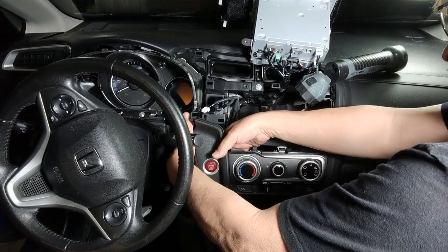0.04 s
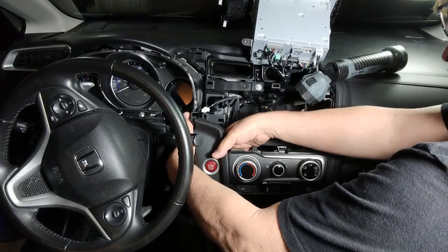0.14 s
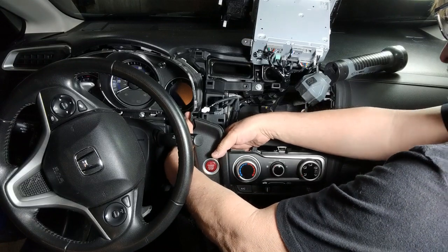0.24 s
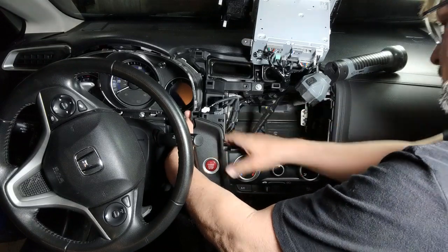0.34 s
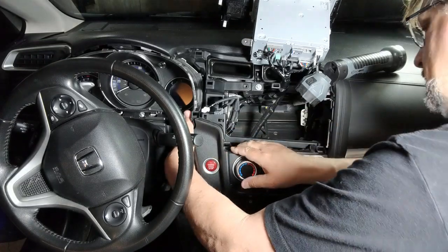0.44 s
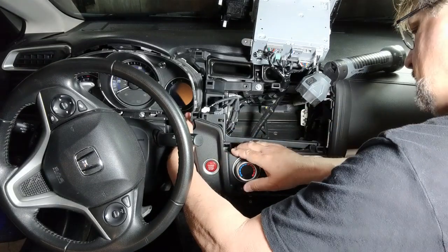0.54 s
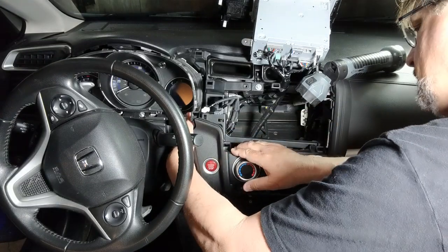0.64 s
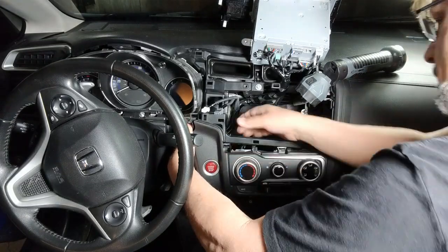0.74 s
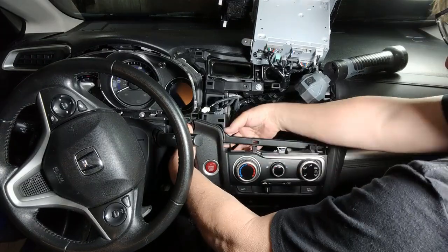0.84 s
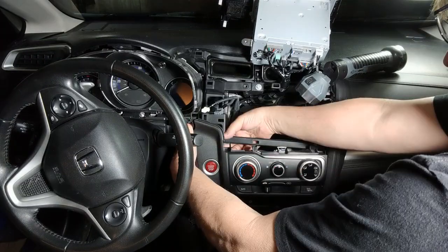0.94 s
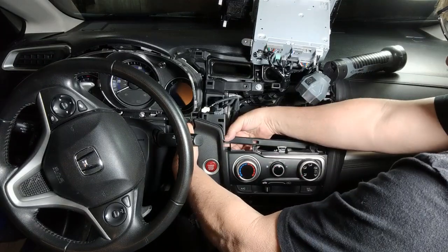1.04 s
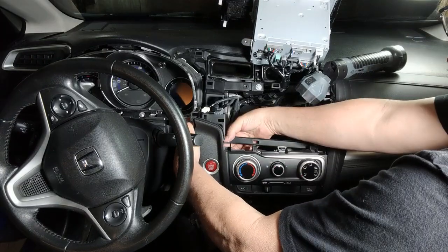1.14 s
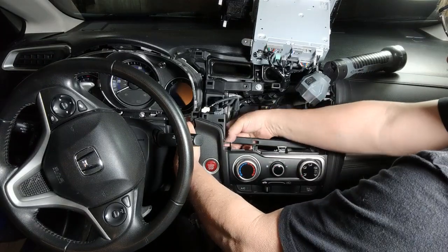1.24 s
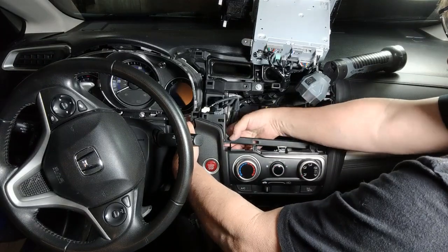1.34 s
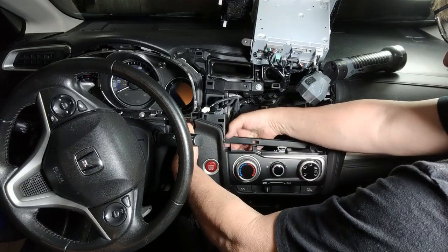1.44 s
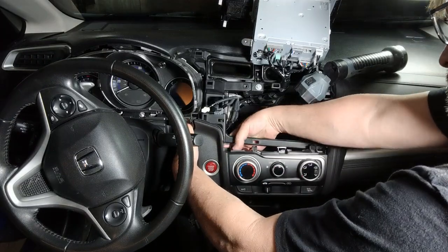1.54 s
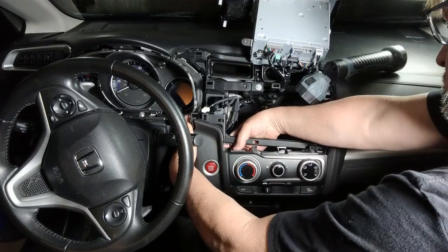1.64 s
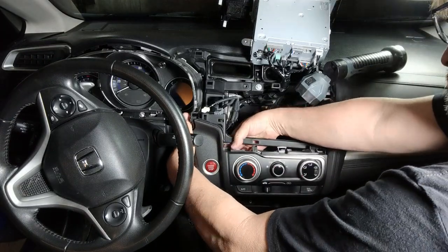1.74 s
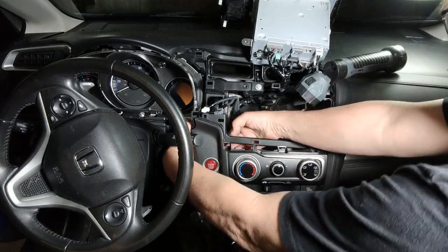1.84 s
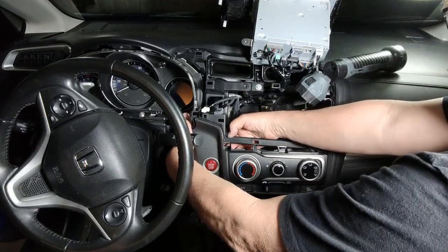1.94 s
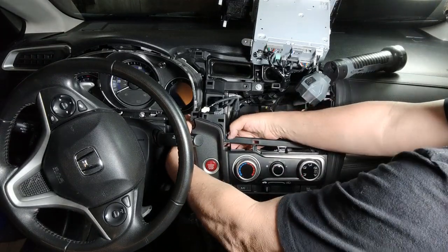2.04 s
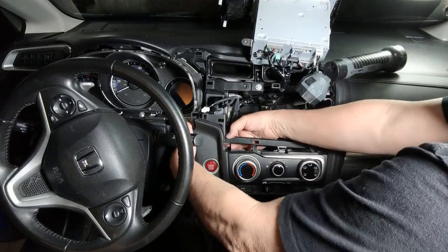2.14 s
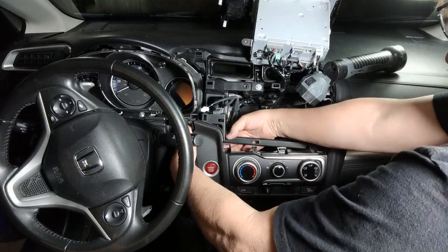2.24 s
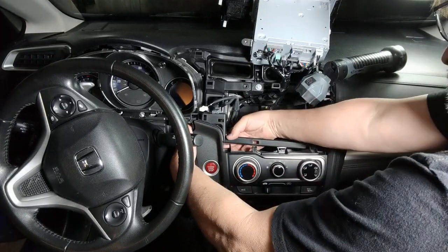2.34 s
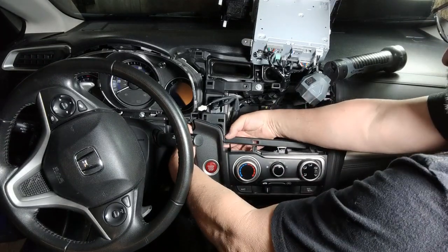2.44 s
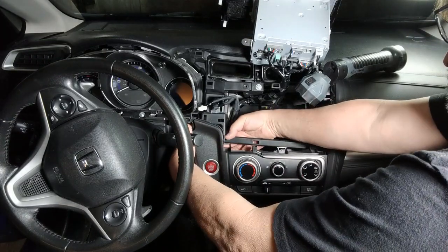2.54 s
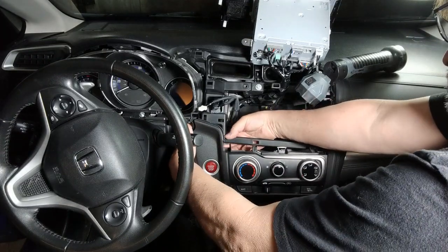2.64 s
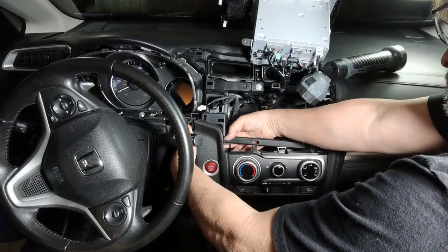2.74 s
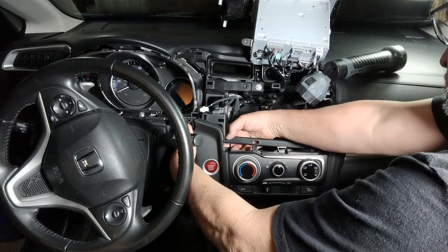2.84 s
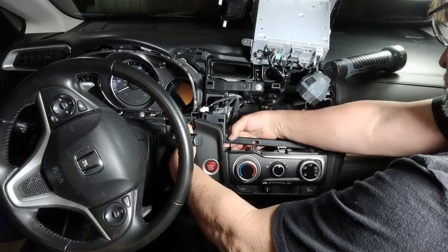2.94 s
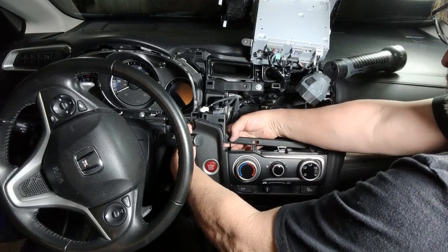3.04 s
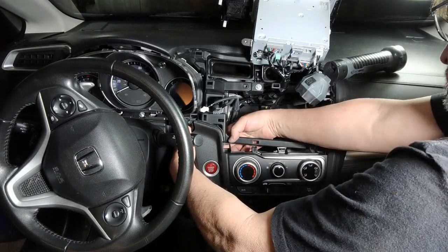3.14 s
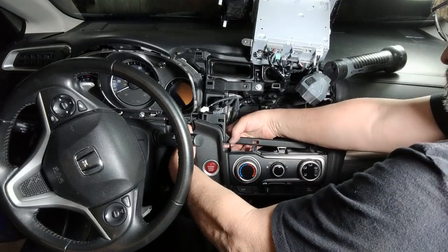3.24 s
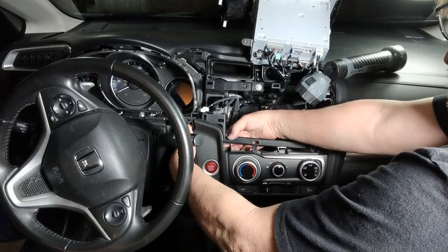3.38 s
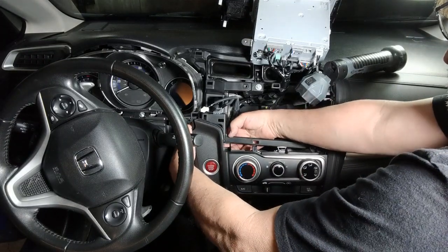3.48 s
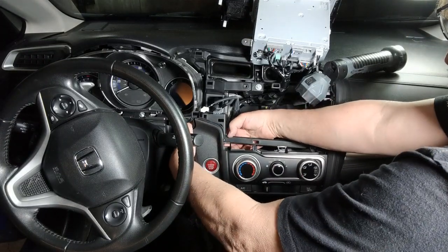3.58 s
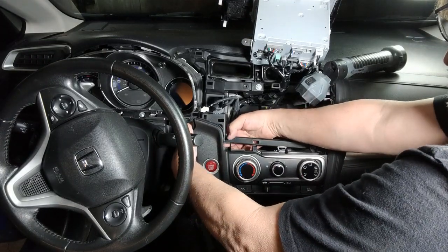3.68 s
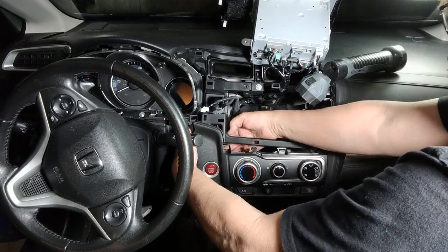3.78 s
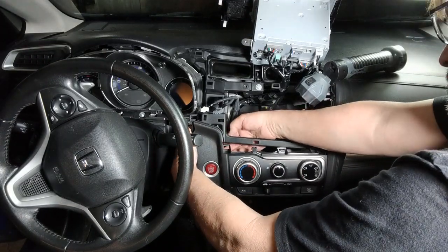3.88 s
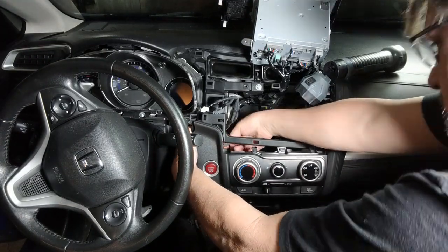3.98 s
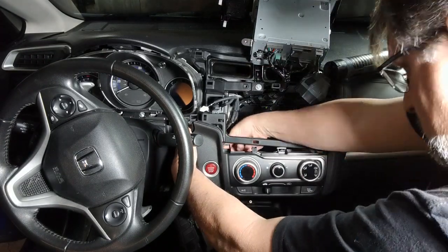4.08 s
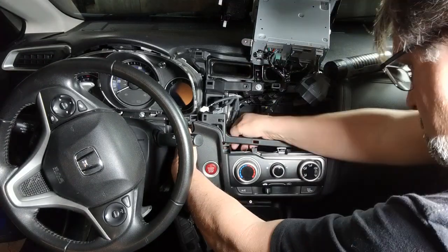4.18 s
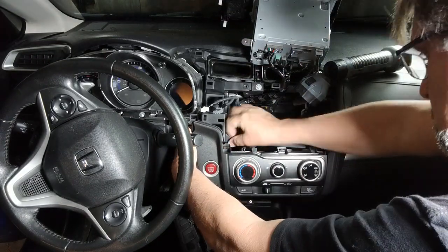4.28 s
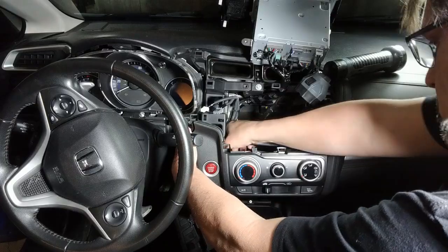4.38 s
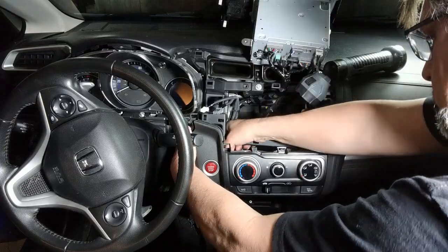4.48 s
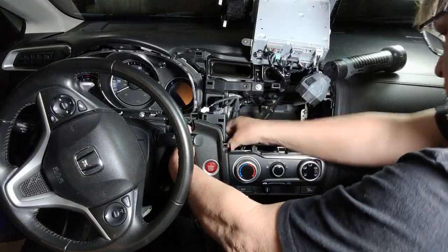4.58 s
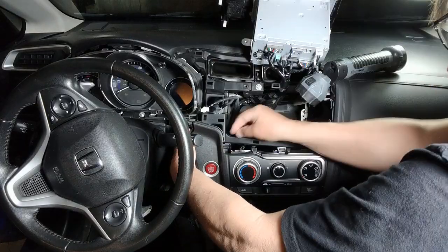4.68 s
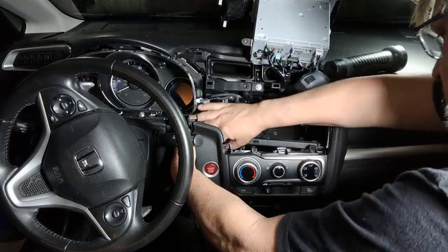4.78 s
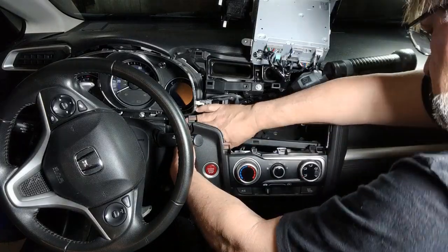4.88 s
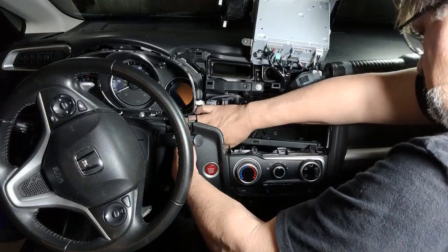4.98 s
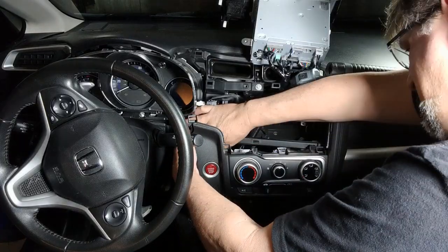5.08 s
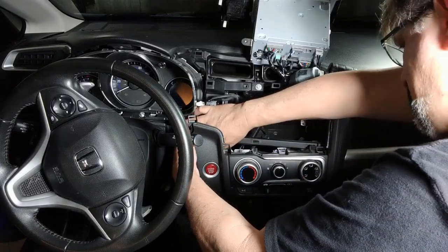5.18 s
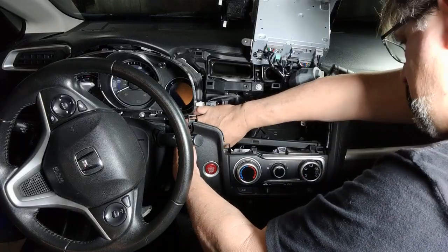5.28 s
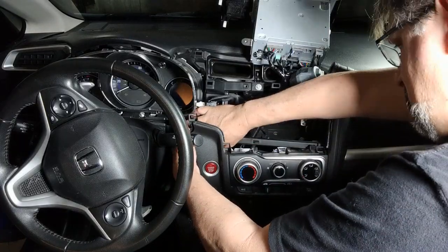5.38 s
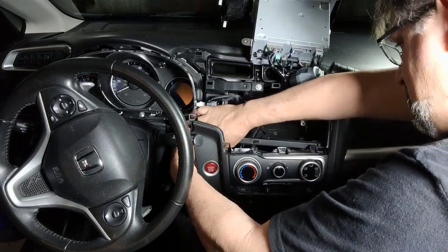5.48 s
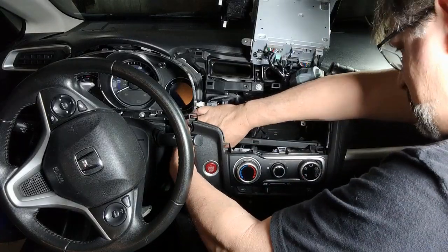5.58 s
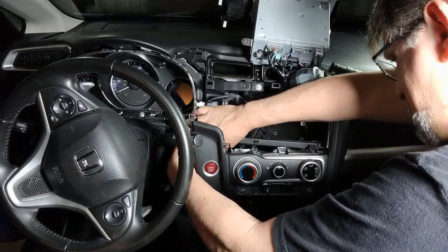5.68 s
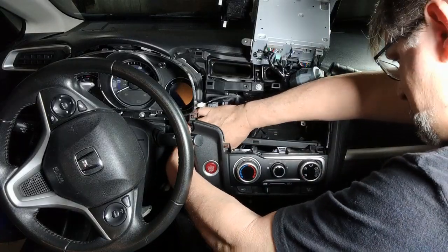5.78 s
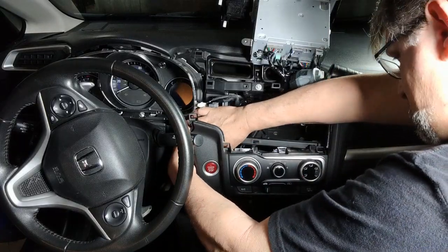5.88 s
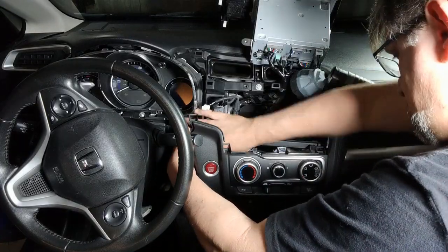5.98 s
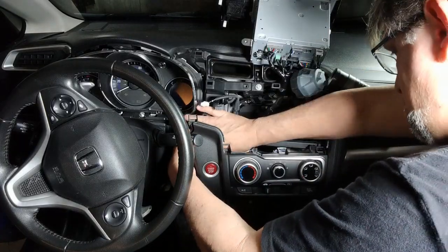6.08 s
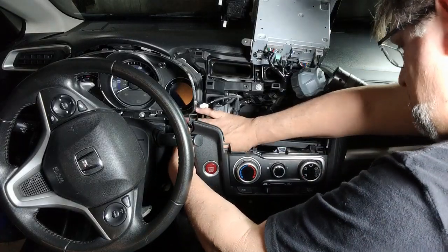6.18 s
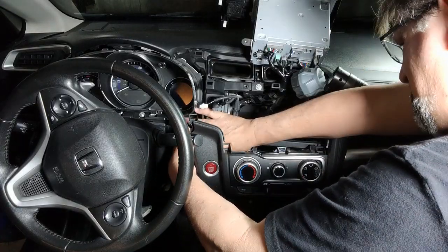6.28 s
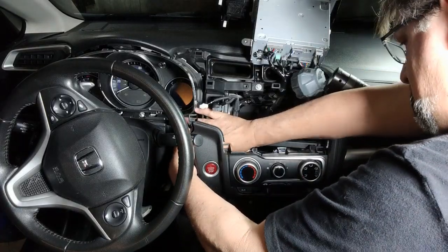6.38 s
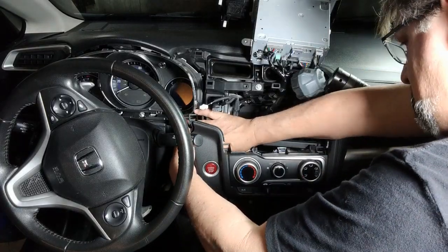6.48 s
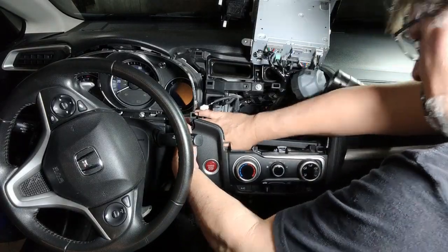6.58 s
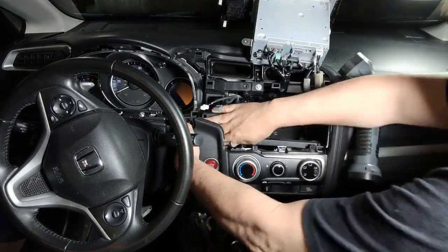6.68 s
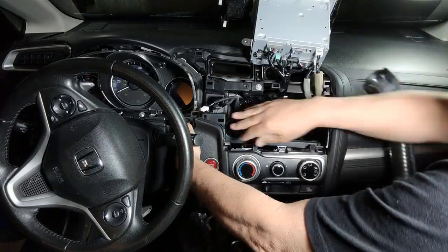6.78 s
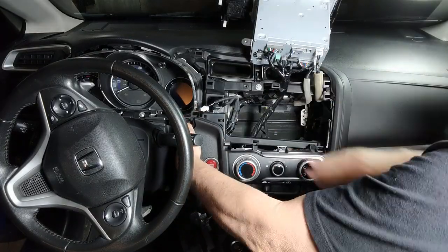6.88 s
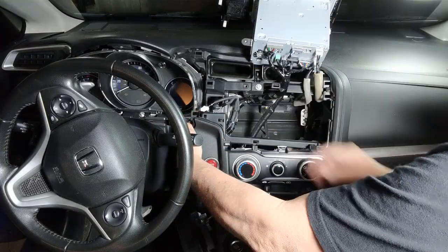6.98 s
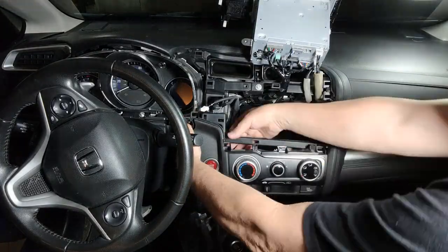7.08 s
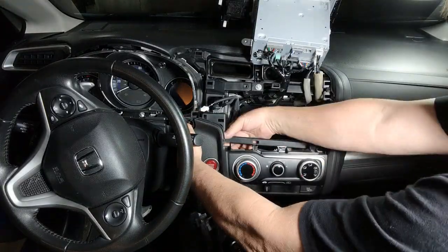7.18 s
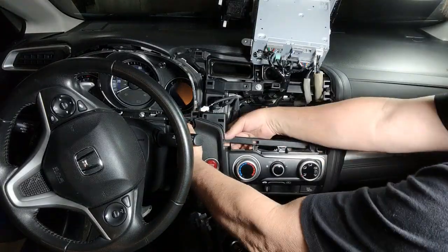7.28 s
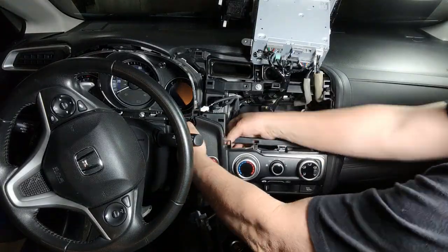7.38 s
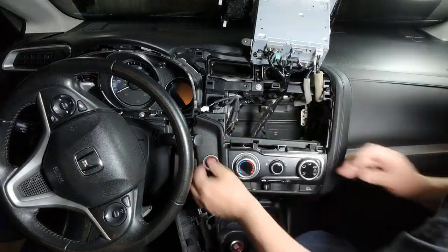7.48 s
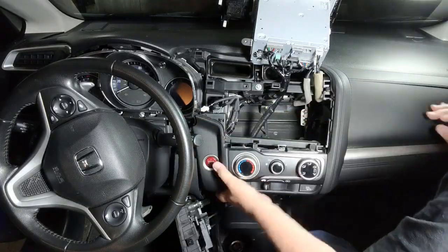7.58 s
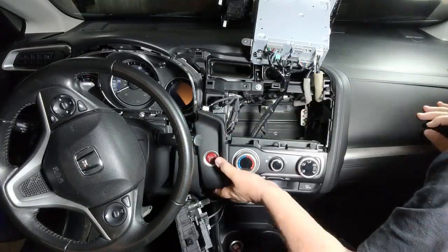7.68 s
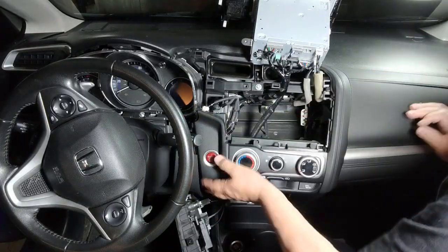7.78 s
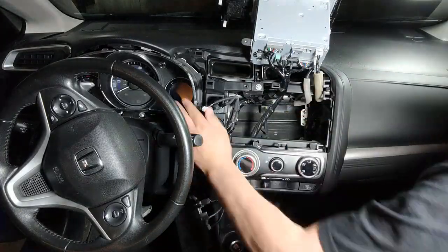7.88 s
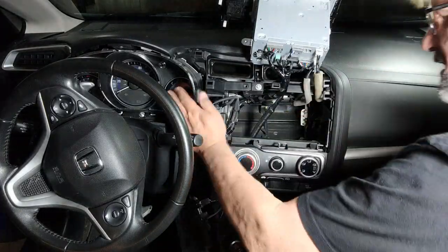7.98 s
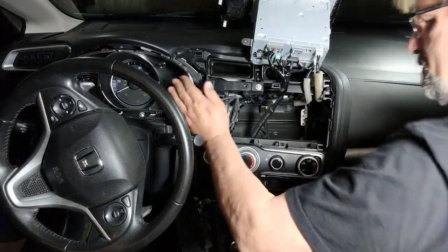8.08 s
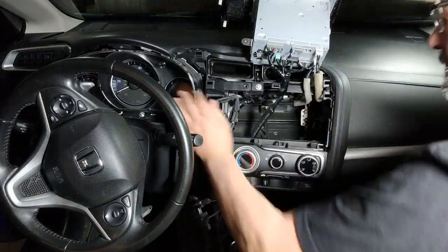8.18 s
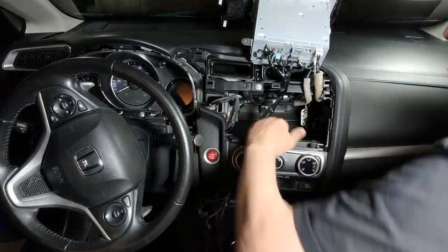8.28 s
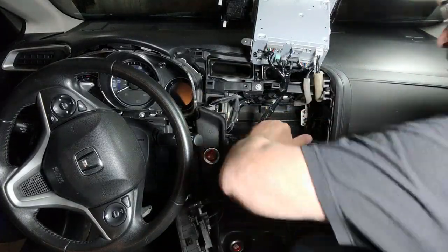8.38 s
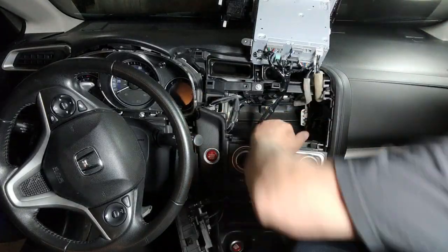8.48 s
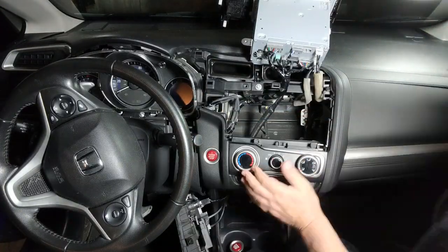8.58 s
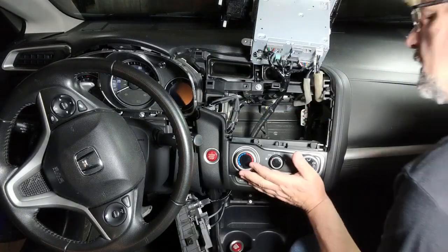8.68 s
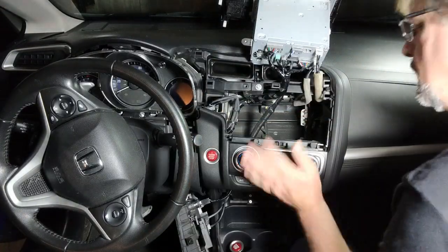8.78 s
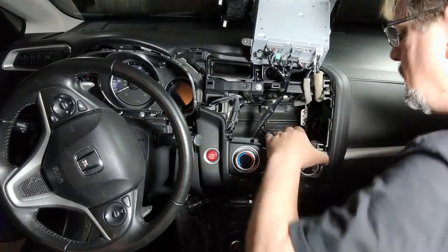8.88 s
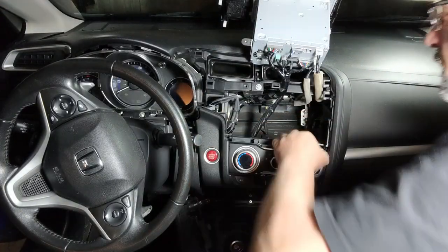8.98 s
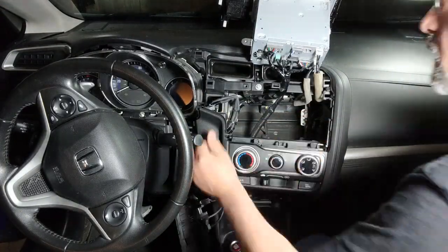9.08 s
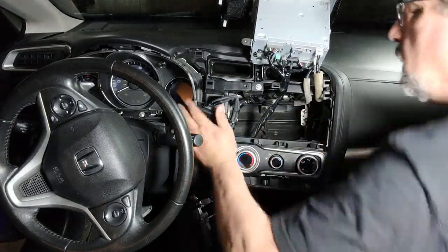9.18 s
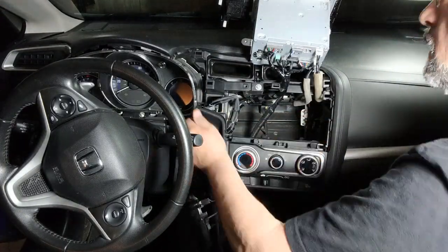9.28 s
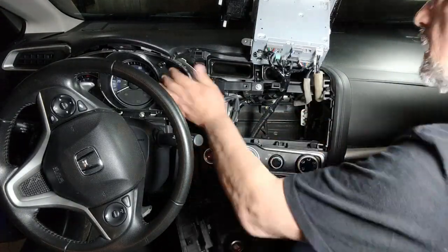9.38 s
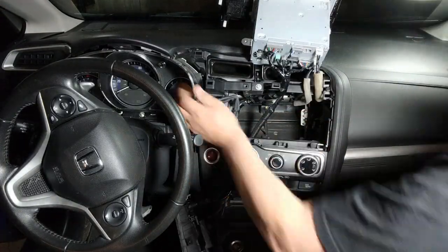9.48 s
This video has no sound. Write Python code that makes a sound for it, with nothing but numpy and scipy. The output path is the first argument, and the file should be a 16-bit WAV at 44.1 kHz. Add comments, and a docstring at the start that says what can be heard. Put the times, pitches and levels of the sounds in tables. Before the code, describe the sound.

A closed, quiet car cabin, heard in mono at arm's length, with faint still air. A low soft rumble opens and cuts off at 0.3 s. From 0.36 to 0.9 s, light plastic taps, ticks and thin scrapes; a tiny sharp scratch at 1.0. Isolated soft thuds follow around 1.6, 1.9, 2.1 and 2.3 s, then 3.1-3.4, over faint rubbing and sleeve rustle. At 4.3 a dry clack; from 4.5 to 4.8 rough little squeaks and firmer rubbing. Quiet pushing and small taps run from 5 to 6.3 s. Movement grows at 6.6-6.95 with duller thuds. A torch lands with a heavy knock at 7.08, then rocks and rattles until 7.4. Squeaks glide at 7.55-7.75 and 7.95-8.15 among clicks and thuds; the loudest snaps come at 8.1 and 8.2. Softer knocks at 8.5 and 8.8, a small tap at 9.3, a brief rub at 9.5.

```python
"""Fitting trim in a car cabin

In a closed, quiet cabin, at arm's length, plastic trim is worked into the dashboard by hand.
Clips tick and snap and the panel thuds: short bursts of noise ring its resonances. A torch lands with clunks.
Fingers rub as noisy catches and squeak as gliding harmonics; pushing stirs the cabin's low resonances.
Sleeves rustle; filtered noise makes the still air and a low rumble that opens the scene and stops abruptly."""
import sys
import numpy as np
from scipy import signal
from scipy.fft import rfft, irfft, next_fast_len
from scipy.io import wavfile
from scipy.ndimage import uniform_filter1d

SR = 44100
rng = np.random.default_rng(int(sys.argv[2]) if len(sys.argv) > 2 else 0)


def generate_wav(signal):
    """Clip the signal to [-1, 1] and save it as 16-bit WAV at the path in sys.argv[1]."""
    frames = np.transpose(np.atleast_2d(signal))
    scaled = np.clip(frames, -1, 1) * 32767
    pcm = np.round(scaled).astype(np.int16)
    wavfile.write(sys.argv[1], SR, pcm)


N = 420273
TIME = np.arange(N) / SR  # s
CUTOFF_HZ = 16100  # top of the sound and of the highest register


def from_db(db):
    """Decibels to gain."""
    return 10 ** (np.asarray(db) / 20)


def rms_one(x):
    """Scale to unit rms."""
    return x / np.sqrt(np.mean(x ** 2) + 1e-20)


def at_hz(points, hz):
    """Read a spectrum on a log-frequency axis."""
    point_hz, point_db = np.transpose(points)
    return np.interp(np.log(np.maximum(hz, 1)), np.log(point_hz), point_db)


def drift(rate, size=N):
    """Random wander of spread 1, with `rate` knots a second joined by straight lines."""
    knots = rng.standard_normal(int(size / SR * rate) + 2)
    # joining the knots narrows the spread, so widen it again
    return np.interp(np.arange(size) / SR * rate, np.arange(len(knots)), knots) * np.sqrt(3 / 2)


def coloured(x, spectrum):
    """Give a long sound a spectrum; rms 1."""
    size = next_fast_len(N)
    gain = from_db(at_hz(spectrum, np.fft.rfftfreq(size, 1 / SR)))
    return rms_one(irfft(rfft(x, size) * gain, size)[:N])


def resonate(x, modes):
    """Each mode lifts its own band and rings on."""
    for hz, width, lift_db in modes:
        ringing = signal.lfilter(*signal.iirpeak(hz, hz / width, fs=SR), x)
        x = x + (from_db(lift_db) - 1) * ringing
    return x


def struck(modes):
    """Each contact lands on another spot and drives every resonance with a strength of its own."""
    return [(hz, width, lift_db * (1 + .5 * rng.uniform(-1.0, 1))) for hz, width, lift_db in modes]


def add(track, s, sound):
    """Lay a sound into a track."""
    start = int(s * SR)
    track[start:start + len(sound)] += sound[:N - start]


# the first push of a contact against the ringing: level at 1 kHz (dB), loss towards the treble (dB per octave)
FIRST_PUSH_DB, FIRST_PUSH_LOSS_DB = -4.5, 2


def blow(levels_db, modes, rings_s, edges_hz, tail_db, tail_s):
    """One contact: a push, dense and quickly damped plastic modes, then the short wash of the cabin."""
    t = np.arange(SR // 4) / SR
    out = 0
    for low, high, level_db, ring_s in zip(edges_hz, [*edges_hz[1:], CUTOFF_HZ], levels_db, rings_s):
        octaves = np.log2(high / 1000)
        ring = from_db(-60 * t / ring_s)
        wash = from_db(tail_db - 1.4 * octaves - 60 * t / tail_s)
        # the contact builds up over its first millisecond
        build_up = 1 - np.exp(-t / 0.00018)
        shake = rng.choice([-1, 1], len(t)) * (ring + wash) * build_up
        shake[0] += np.linalg.norm(shake) * from_db(FIRST_PUSH_DB - FIRST_PUSH_LOSS_DB * octaves)
        # the plastic radiates less towards the top of each register
        shake = signal.lfilter(*signal.butter(1, 0.83 * low, fs=SR), shake)
        register = signal.butter(4, [low, high], "band", fs=SR, output="sos")
        sound = resonate(signal.sosfilt(register, shake), modes)
        # the level is the energy spread over 10 ms
        out = out + from_db(level_db) * sound / np.sqrt(np.sum(sound ** 2) / (SR / 100))
    return out


# Resonances of the dashboard plastic. Each row: centre in Hz, width in Hz, lift in dB.
PANEL = [(514, 79, 2.5), (844, 38, -1), (1437, 120, 3.5), (3835, 700, 5.5), (6030, 1420, 7)]
# Lower edges of the trim's thud, knock, clack and tick registers, in Hz.
TRIM_HZ = [200, 450, 1550, 7000]


def panel_blow(levels_db, rings_s, edges_hz):
    """A contact on the panel, with a cabin wash that falls by 60 dB in 0.1 s."""
    return blow(levels_db, struck(PANEL), rings_s, edges_hz, tail_db=-17, tail_s=.1)


# Spectrum of the still cabin air. Each row: frequency in Hz, relative level in dB.
STILL = [(25, -41), (110, -21), (220, -10), (500, -7.5), (1000, -21), (3000, -22), (16000, -36.5)]
# Spectrum of the opening rumble. Each row: frequency in Hz, relative level in dB.
RUMBLE = [(35, -18), (58, 0), (170, -18), (500, -80)]
RUMBLE_END_S = .313


def background():
    """Steady noise as still cabin air, and low noise as a rumble at the start."""
    air = from_db(-75.0) * coloured(rng.standard_normal(N), STILL)
    rumble = from_db(-62.0) * coloured(rng.standard_normal(N), RUMBLE)
    return air, rumble * uniform_filter1d(1. * (TIME < RUMBLE_END_S), size=200)


# Between moves the hands keep holding the panel.
HOLD_PUSH_DB, HOLD_RUB_DB = -63, -69.5
# A move swells and eases off over these shares of its length; they overlap, so it tops out just under full.
MOVE_ATTACK_SHARE, MOVE_RELEASE_SHARE = 0.19, 0.86
# The hands shift their grip, pushing on the panel and sliding over it.
# Each row: start in seconds, length in seconds, pushing level in dB, rubbing level in dB, before the swell.
MOVES = [(0.375, 0.16, -57, -70.5), (0.788, 0.35, -62, -65.5), (1.215, 0.2, -57.5, -70),
         (2.234, 0.13, -61, -62), (3.517, 0.28, -60, -69), (3.79, 1, -65.5, -68.5),
         (4.504, 0.47, -60, -60.5), (5.044, 0.25, -59, -63.5), (5.255, 0.17, -51.5, -61),
         (5.511, 0.052, -58, -62), (5.756, 0.53, -58.5, -69), (6.689, 0.15, -45, -53.5),
         (7.067, 0.34, -52.5, -60), (7.445, 0.24, -54, -60.5), (7.67, 0.52, -53.5, -61),
         (8.161, 0.19, -48.5, -63.5), (8.447, 0.21, -58, -62.5), (9.285, 0.17, -56.5, -66.5),
         (9.488, 0.036, -48.5, -54)]


def effort():
    """Levels of pushing and rubbing (dB): the power of a steady hold plus a swell for each move."""
    push = np.full(N, from_db(HOLD_PUSH_DB) ** 2)
    rub = np.full(N, from_db(HOLD_RUB_DB) ** 2)
    for s, length_s, push_db, rub_db in MOVES:
        along = np.linspace(0, 1, int(length_s * SR))
        swell = np.minimum(1, np.minimum(along / MOVE_ATTACK_SHARE, (1 - along) / MOVE_RELEASE_SHARE))
        add(push, s, (from_db(push_db) * swell) ** 2)
        add(rub, s, (from_db(rub_db) * swell) ** 2)
    return 10 * np.log10(push), 10 * np.log10(rub)


def pressure_of(rub_db):
    """How hard the hands bear on the plastic: 0 while holding, 1 in a firm rub."""
    return np.clip(from_db(rub_db - HOLD_RUB_DB) - 1, 0, 1)


# Catches a second on each spot, sharpness of their ring (Q), smooth sliding against the catches.
CATCHES_PER_S, CATCH_Q, SLIDE_SHARE = 70, 7, .55


def friction(pressure):
    """Sliding noise; pressure (0-1) adds tiny uneven catches, each ringing another spot of the plastic."""
    out = 0
    count = int(CATCHES_PER_S * N / SR)
    for hz in np.geomspace(TRIM_HZ[1], CUTOFF_HZ, 20):
        catches = np.zeros(N)
        catches[rng.integers(N, size=count)] = rng.standard_normal(count) * rng.random(count)
        drive = pressure * rms_one(catches) + SLIDE_SHARE * rng.standard_normal(N)
        out = out + signal.lfilter(*signal.iirpeak(hz, CATCH_Q, fs=SR), drive)
    return out


# Low resonances of the cabin. Each row: centre in Hz, width in Hz, lift in dB.
CABIN = [(216, 23, 5), (276.2, 13.2, 10.5)]
# Spectrum of pushing, ahead of the cabin. Each row: frequency in Hz, relative level in dB.
PUSH = [(60, -22.5), (135, -22.5), (190, -2), (285, -4), (400, -8.5), (900, -39)]
# Colouring of the rubbing. Each row: frequency in Hz, relative level in dB.
RUB = [(200, -10), (480, 2.5), (720, 6.5), (1300, -3.5), (2300, -10.5), (6000, -37)]
# Colouring of the sleeves and wires. Each row: frequency in Hz, relative level in dB.
RUSTLE = [(700, -56), (2000, 0), (7000, -3), (14000, 0)]
# Sleeves and wires rustle at a nearly steady level, grainier in a firm rub: level while holding, ceiling.
RUSTLE_DB, RUSTLE_TOP_DB = -73.5, -73


def hands():
    """Pushing booms in the cabin, rubbing sounds the panel, sleeves and wires rustle nearly steadily."""
    push_db, rub_db = effort()
    rustle_db = np.minimum(RUSTLE_DB + rub_db - HOLD_RUB_DB, RUSTLE_TOP_DB)
    boom = resonate(coloured(rng.standard_normal(N), PUSH), CABIN)
    grains = resonate(friction(pressure_of(rub_db)), PANEL)
    pushing = from_db(push_db) * rms_one(boom)
    rubbing = from_db(rub_db) * coloured(grains, RUB)
    rustling = from_db(rustle_db) * coloured(grains, RUSTLE)
    # the grip tightens and slackens
    grip = from_db(2 * np.clip(drift(24), -2, 1))
    return grip * (pushing + rubbing + rustling)


# Faint random ticks: how many a second while holding, and how many more in a firm rub.
HOLD_TICKS_PER_S, RUB_TICKS_PER_S = 5, 38
# Their level, and the most that pressure adds to it; like the table's, before the tick's own colour.
TICK_DB, TICK_PRESSED_DB = -76, 11
# Every tick: knock, clack and tick registers (dB), ring t60 (s).
TICK_COLOUR_DB, TICK_RING_S = [-3, 1.5, 1], 0.015
# Loose edges tick against each other under the hands. Each row: time in seconds, level in dB.
TICKS = [(0.5791, -60.5), (0.608, -64), (1.048, -68.5), (2.046, -61), (3.021, -62.5), (3.171, -60.5),
         (3.971, -65), (4.106, -64.5), (4.209, -60), (4.4205, -64), (4.5568, -65), (4.7208, -54),
         (4.8063, -55), (4.963, -65.5), (5.135, -63.5), (6.676, -59), (6.807, -57.5), (7.462, -56.5),
         (8.852, -62.5), (9.311, -69)]


def loose_edges():
    """Edges tick without the panel's thud: a few clearly, many faintly at random, crowding in a rub."""
    out = np.zeros(N)
    _, rub_db = effort()
    pressure = pressure_of(rub_db)
    edges = [panel_blow(TICK_COLOUR_DB, rings_s=[TICK_RING_S] * 3, edges_hz=TRIM_HZ[1:]) for _ in range(20)]
    moments = np.flatnonzero(rng.random(N) < (HOLD_TICKS_PER_S + RUB_TICKS_PER_S * pressure) / SR)
    faint = [(at / SR, TICK_DB + TICK_PRESSED_DB * pressure[at] * rng.random()) for at in moments]
    for s, level_db in [*TICKS, *faint]:
        add(out, s, from_db(level_db) * edges[rng.integers(len(edges))])
    return out


# Unevenness of a scrape's catches (dB), sharpness of its resonance (Q).
SCRAPE_GRAIN_DB, SCRAPE_Q = 4, 3
# Edges scrape and hiss without squeaking.
# Each row: start in seconds, length in seconds, rms level in dB before fading in and out, centre in Hz.
SCRAPES = [(0.405, 0.08, -63.5, 14500), (0.856, 0.1, -65.5, 2220), (1.013, 0.0045, -41, 14000),
           (2.244, 0.018, -59, 6000), (2.272, 0.12, -68, 1620), (4.273, 0.043, -56.5, 1310),
           (4.819, 0.028, -56.5, 1370)]


def scrapes():
    """An edge drags over grained plastic: a fast, uneven run of catches rings one broad resonance."""
    out = np.zeros(N)
    for s, length_s, level_db, centre_hz in SCRAPES:
        size = int(length_s * SR)
        grit = rng.standard_normal(size) * from_db(SCRAPE_GRAIN_DB * drift(220, size=size))
        bite = signal.lfilter(*signal.iirpeak(centre_hz, SCRAPE_Q, fs=SR), grit)
        scrape = rms_one(resonate(bite, PANEL))
        add(out, s, from_db(level_db) * scrape * signal.windows.tukey(size))
    return out


# Colour of the slips. Each row: frequency in Hz, relative level in dB.
SQUEAK_COLOUR = [(350, -2), (700, 3.5), (1300, -5.5), (2400, -15), (3600, -27), (13000, -38)]
# A squeak's level starts and ends this far under its peak, before the fades at its ends.
SQUEAK_SWELL_DB = 9.5
# Skin and plastic edges stick and slip in short glides. Each row: start in seconds, length in seconds,
# first pitch in Hz, last pitch in Hz, level at the peak in dB, place of the peak (0-1), roughness (0-1),
# brightness in dB per octave above the fundamental.
SQUEAKS = [(4.504, 0.06, 688, 570, -52, 0.18, 0.9, -5), (4.57, 0.061, 387, 349, -49.5, 0.1, 0.66, 3),
           (4.636, 0.033, 500, 802, -44.5, 0.23, 0.6, -2.5), (4.678, 0.07, 353, 392, -47.5, 0.64, 0.6, 0.5),
           (4.738, 0.053, 365, 401, -46, 0.25, 0.33, -1.5),
           (7.561, 0.048, 473, 474, -43.5, 0.24, 0.85, 4.5), (7.644, 0.079, 519, 828, -36, 0.55, 0.4, 1),
           (7.706, 0.063, 828, 634, -39.5, 0.2, 0.54, -10), (7.963, 0.055, 551, 675, -42, 0.8, 0.38, -0.5),
           (8.046, 0.054, 596, 677, -48, 0.5, 0.83, 3), (8.114, 0.038, 650, 777, -42, 0.6, 0.65, 3),
           (8.129, 0.016, 5330, 4900, -52, 0.5, 0, -16)]


def squeaks():
    """Regular slips make a gliding stack of harmonics; a loose grip makes it wander, jitter and flutter."""
    out = np.zeros(N)
    for s, length_s, first_hz, last_hz, peak_db, peak_at, rough, bright_db in SQUEAKS:
        along = np.linspace(0, 1, int(length_s * SR))
        size = len(along)
        level_db = peak_db - SQUEAK_SWELL_DB * np.interp(along, [0, peak_at, 1], [1, 0, 1])
        jitter = rough * (.08 * rough * drift(700, size=size) + .06 * drift(80, size=size))
        # the slide gathers speed and eases off again
        glide = (1 - np.cos(np.pi * along)) / 2
        pitch = (first_hz + (last_hz - first_hz) * glide) * (1 + jitter)
        phase = 2 * np.pi * np.cumsum(pitch) / SR
        orders = np.arange(1, 17)[:, None]
        harmonic_hz = orders * pitch
        # each harmonic swells and fades as it glides across the many modes of the panel
        mode_hz = np.arange(0, SR, 160)
        ripple_db = 3.5 * np.interp(harmonic_hz, mode_hz, rng.standard_normal(len(mode_hz)))
        colour_db = at_hz(SQUEAK_COLOUR, harmonic_hz) + bright_db * np.log2(orders) + ripple_db
        harmonics = from_db(colour_db) * (harmonic_hz < CUTOFF_HZ) * np.sin(orders * phase)
        slips = harmonics.sum(axis=0)
        flutter = from_db(5 * rough ** 2 * drift(350, size=size))
        add(out, s, rms_one(slips * flutter) * from_db(level_db) * signal.windows.tukey(size, .3))
    return out


# Dry pinpoint clicks. Each row: time in seconds, peak in dB ahead of the final top cut.
PINPOINTS = [(7.21, -31), (7.7353, -25), (7.8685, -33), (8.177, -21), (8.3438, -23)]


def pinpoints():
    """Single spikes with a smaller opposite kick, too short to set anything ringing."""
    out = np.zeros(N)
    for s, peak_db in PINPOINTS:
        add(out, s, from_db([peak_db]))
    return signal.lfilter([1, -.4], [1], out)


# Resonances of the torch housing. Each row: centre in Hz, width in Hz, lift in dB.
HOUSING = [(680, 76, 3), (2850, 72, 6.5), (3500, 320, 10)]
# Lower edges of the torch's thud, knock, clack and tick registers, in Hz.
TORCH_HZ = [210, 450, 1900, 5500]
# Ring of the spot struck: sharpness (Q), lift (dB).
SPOT_Q, SPOT_LIFT_DB = 6.4, 11.5
# The torch lands, rocks and clicks. Each row: time in seconds, thud, knock, clack and tick levels in dB,
# ring t60 in seconds, pitch of the spot struck in Hz.
CLUNKS = [(7.0784, -35.5, -24.5, -32.5, -38.5, 0.013, 677), (7.1604, -69, -42, -46, -56, 0.06, 1470),
          (7.2225, -50, -34.5, -31, -43, 0.098, 1010), (7.2822, -76, -48, -50, -67, 0.13, 2240),
          (7.3067, -55, -36.5, -39.5, -56.5, 0.048, 1200), (7.381, -54, -49.5, -42, -37.5, 0.018, 5800)]


def torch():
    """A heavy knock, then rattling rocks of the housing; each spot rings its own way, and ticks die first."""
    out = np.zeros(N)
    for s, *levels_db, ring_s, spot_hz in CLUNKS:
        modes = [*HOUSING, (spot_hz, spot_hz / SPOT_Q, SPOT_LIFT_DB)]
        rings_s = [ring_s, ring_s, ring_s, ring_s / 2]
        add(out, s, blow(levels_db, modes, rings_s, edges_hz=TORCH_HZ, tail_db=-16.5, tail_s=0.088))
    return out


# The panel springs back and touches again: shortest delay (s), greatest level (dB).
REBOUND_S, REBOUND_DB = .005, -7
# Taps and snaps of the trim. Each row: time in seconds, thud level in dB, contact (clack) level in dB,
# brightness in dB per register.
TAPS = [(0.36, -48.5, -62, -6), (0.4054, -58, -54.5, -5), (0.679, -56, -65, -10.5),
        (0.7106, -51, -54.5, -1.5), (0.885, -61, -59, 0), (1.6443, -45, -52.5, -1),
        (1.9181, -46.5, -51, -5), (2.1289, -49.5, -53, -1), (2.2717, -48.5, -53.5, 4.5),
        (3.0936, -48, -56, -3.5), (3.2141, -80, -54, 2.5), (3.387, -52, -55, 1.5), (3.92, -62, -57, 4.5),
        (4.3288, -78, -51, 3.5), (4.735, -45.5, -56, 0), (4.8833, -56, -58, 2), (5.123, -51.5, -64.5, -4),
        (5.3989, -54.5, -56.5, 1.5), (5.529, -57, -61.5, -2.5), (6.286, -51.5, -74, -16),
        (6.5668, -45.5, -58.5, 1), (6.664, -54, -55, 3), (6.72, -41.5, -61, -7), (6.951, -38, -51, -12),
        (7.7123, -39, -41.5, -4), (7.83, -40, -54.5, -1.5), (7.8916, -45.5, -49.5, -5),
        (8.093, -31.5, -38, -2.5), (8.2039, -35, -32.5, 0), (8.4932, -42.5, -47, -5.5),
        (8.532, -43.5, -67, 0), (8.798, -47.5, -56.5, -1), (9.285, -51.5, -60.5, 3)]


def trim():
    """Clips and panel edges: brightness tilts a contact from knock to tick; the low thud rings longest."""
    out = np.zeros(N)
    for s, thud_db, contact_db, bright_db in TAPS:
        levels_db = [thud_db, contact_db - bright_db, contact_db, contact_db + bright_db]
        tap = panel_blow(levels_db, rings_s=[.07, .042, .02, .015], edges_hz=TRIM_HZ)
        add(out, s, tap)
        rebound_s = REBOUND_S * (1 + rng.random())
        add(out, s + rebound_s, from_db(REBOUND_DB) * rng.random() * tap)
    return out


DIP_S = (.281, .309)  # start and end of the dip


def scene():
    """All at arm's length; handling starts softly, and it and the air drop out just before the rumble ends."""
    air, rumble = background()
    dip = uniform_filter1d(1. * ((TIME < DIP_S[0]) | (TIME > DIP_S[1])), size=100)
    quiet_start = from_db(-3.5 * (TIME < DIP_S[0]))
    handling = (hands() + loose_edges()) * quiet_start
    contacts = scrapes() + squeaks() + pinpoints() + torch() + trim()
    return (contacts + (handling + air) * dip + rumble)[None]


def record(dry):
    """One microphone channel, its top cut steeply by an elliptic low-pass."""
    return signal.sosfilt(signal.ellip(10, .1, 70, CUTOFF_HZ, fs=SR, output="sos"), dry)


dry = scene()
out = record(dry)
generate_wav(out)
```